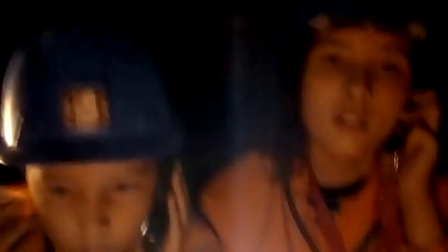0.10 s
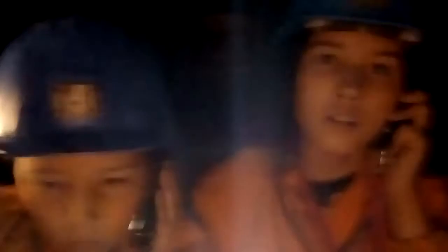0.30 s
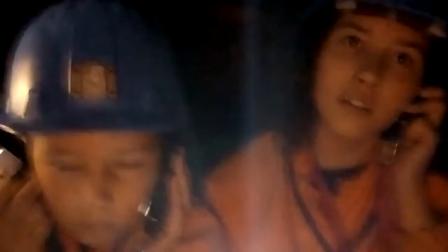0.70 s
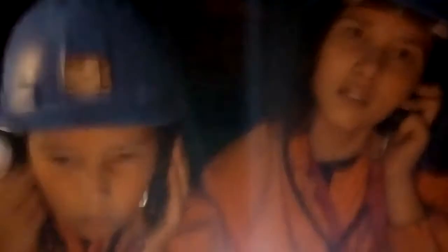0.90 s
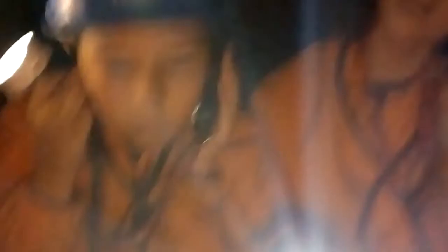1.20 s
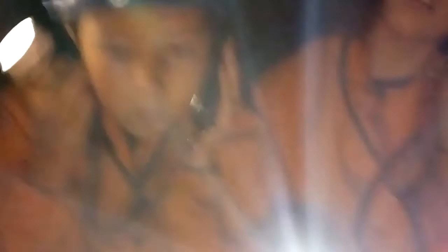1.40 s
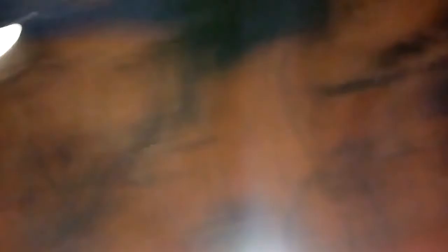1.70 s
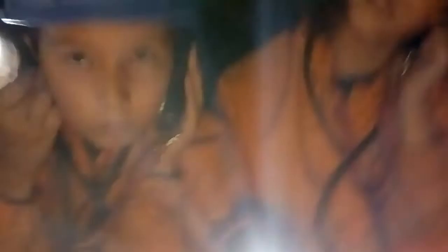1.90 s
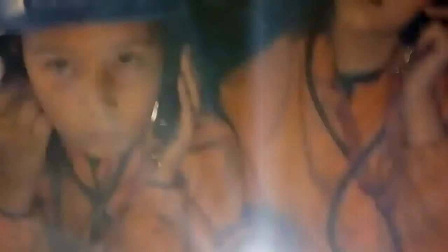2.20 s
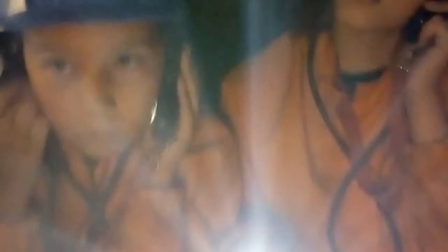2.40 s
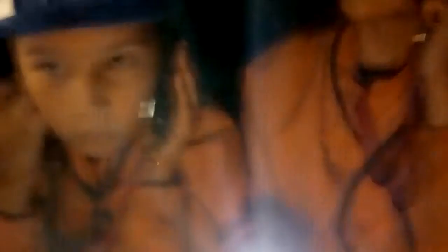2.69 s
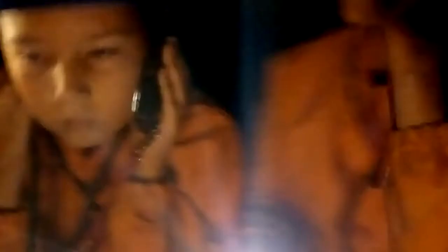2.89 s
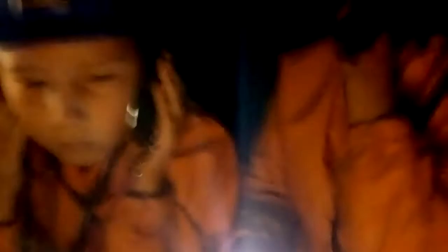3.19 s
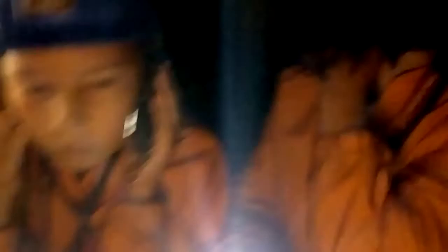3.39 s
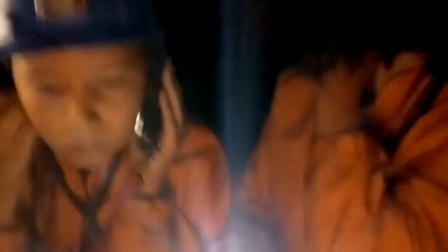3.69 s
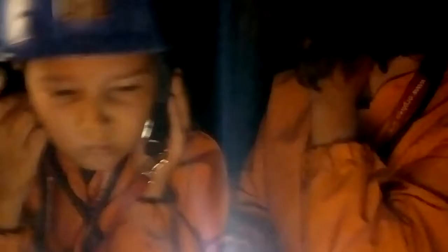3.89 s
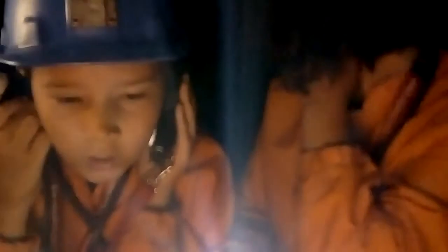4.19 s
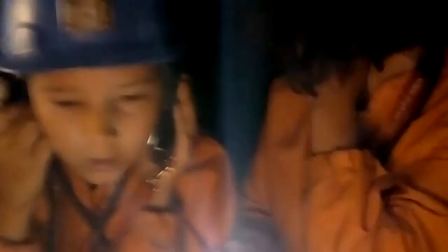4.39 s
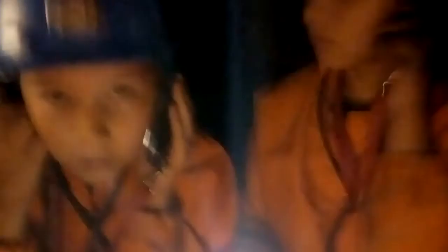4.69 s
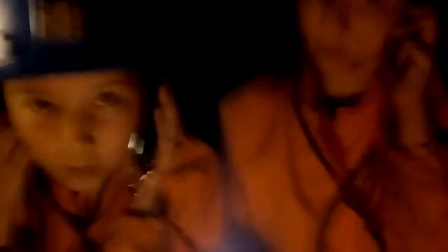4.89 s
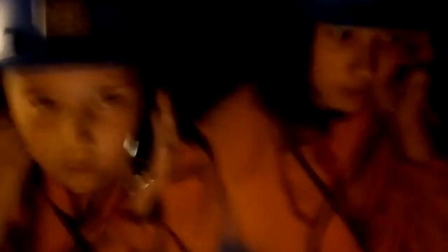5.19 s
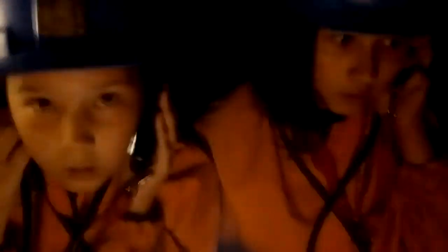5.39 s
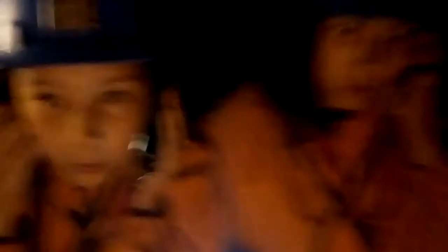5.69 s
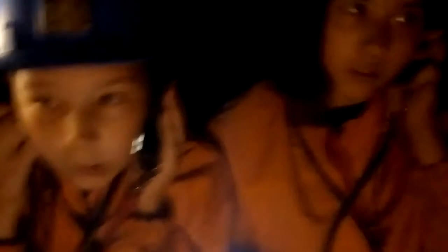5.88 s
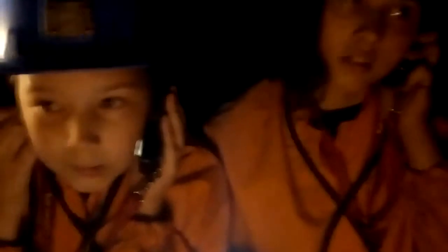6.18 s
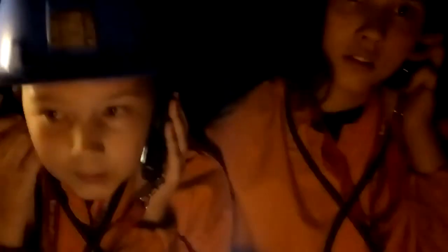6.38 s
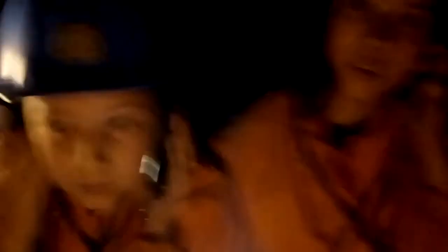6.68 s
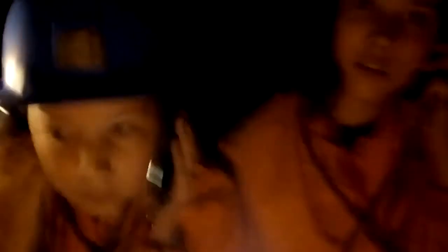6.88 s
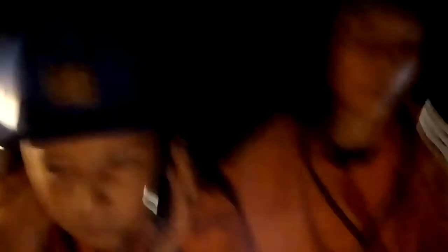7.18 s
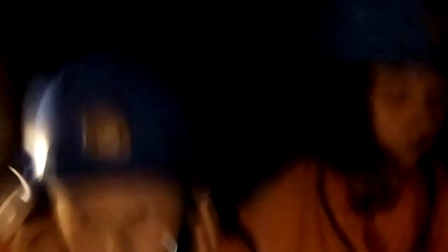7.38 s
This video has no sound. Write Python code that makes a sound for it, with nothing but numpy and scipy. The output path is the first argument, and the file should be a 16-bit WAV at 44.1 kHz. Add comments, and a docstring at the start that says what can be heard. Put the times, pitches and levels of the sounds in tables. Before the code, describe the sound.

A small mine train rumbles through a tunnel, heard inside its steel car, with booming jolts, rattling fittings, clanks, brief scrapes and late regular wheel knocking.

```python
"""A small mine train rolls through a tunnel, heard on two spaced microphones inside a steel passenger car.
Noise through resonant modes makes the cabin boom and the panels drone; gliding tones make jolts and groans.
Coloured noise with random impacts makes loose fittings chatter; short crashes with rings clank and click.
Late on, one wheel starts knocking at every turn, in damped modes and bursts of noise.
Steel scrapes on steel in two pairs of hissing noise strokes. The din overloads the recorder."""
import sys
import numpy as np
from scipy import signal
from scipy.fft import rfft, irfft
from scipy.io import wavfile

SR = 44100
rng = np.random.default_rng(int(sys.argv[2]) if len(sys.argv) > 2 else 0)


def output_pcm(signal):
    """Save a mono or channel-first signal as 16-bit PCM at the path in sys.argv[1].

    Samples are clipped to [-1, 1] before scaling.
    """
    pcm = np.clip(np.atleast_2d(signal).T, -1, 1) * 32767
    wavfile.write(sys.argv[1], SR, np.round(pcm).astype(np.int16))


N = 332514
TIME = np.arange(N) / SR
HZ = np.fft.rfftfreq(N, 1 / SR)

# hiss of sliding or shaken steel, relative spectrum: f/Hz, density/dB
HISS_SPECTRUM = [(700, -20), (1500, 2.5), (2600, 5.5), (3400, 6.5), (4300, 2), (5300, 3), (7000, 3),
                 (10200, 0.7), (11500, -2), (13500, -6.5), (15500, -13)]


def gain_of(db):
    """Amplitude gain of a level in dB."""
    return 10 ** (np.asarray(db) / 20)


def evened(x):
    """Scales to rms 1."""
    return x / np.sqrt(np.mean(x ** 2) + 1e-20)


def read_gain(points):
    """A dB spectrum, read over log frequency, as a gain at every bin."""
    f, db = np.transpose(points)
    return gain_of(np.interp(np.log(HZ + 1), np.log(f + 1), db))


def levels(rows):
    """One gain curve over time for each dB column."""
    s, *columns = np.transpose(rows)
    return [gain_of(np.interp(TIME, s, column)) for column in columns]


def resonances(modes, skirt):
    """Gain of a set of modes; a larger skirt power gives darker valleys."""
    power = 0
    for f, width, db in modes:
        detuning = 2 * (HZ - f) / width
        power = power + gain_of(db) ** 2 / (1 + detuning ** 2 / skirt) ** skirt
    return np.sqrt(power)


def smooth(x, seconds):
    """Gaussian average over time."""
    return irfft(rfft(x) * np.exp(-2 * (np.pi * HZ * seconds) ** 2), N)


def flutter(seconds, depth_db):
    """A random gain that changes on the given time scale."""
    return gain_of(depth_db * evened(smooth(rng.standard_normal(N), seconds)))


def noise():
    """Two unrelated white noises."""
    return rng.standard_normal((2, N))


def in_cabin(drive, colour):
    """Colours two unrelated drives; long waves reach both microphones alike, short ones do not."""
    # spread between the spaced microphones: f/Hz, side minus mid/dB
    mic_spread = [(90, -47), (140, -51), (210, -5), (260, -7.5), (350, -15.5), (520, -15.5), (620, -7),
                  (770, 0), (980, -2), (1170, 0), (1650, 3), (2200, 0), (15000, 0)]
    # balance between the microphones: f/Hz, left minus right/dB
    mic_balance = [(450, 0), (750, .8), (1300, 2.3), (2400, 2), (4400, 1.2), (8000, 2), (15000, .5)]
    mid, side = rfft(drive)
    width = read_gain(mic_spread)
    lean = read_gain(mic_balance) ** .5  # half the difference at either microphone
    left = (mid + width * side) * lean
    right = (mid - width * side) / lean
    pair = np.array([left, right]) / np.sqrt(1 + width ** 2)
    return irfft(pair * evened(colour), N)


def sustained(x, seconds):
    """Holds the power even over the given time, as under a steady drive."""
    return x / np.sqrt(abs(smooth((x ** 2).mean(0), seconds)) + 1e-9)


def impacts(per_s, spread_db, ring_s):
    """Power of many small random impacts, each dying quickly."""
    struck = rng.random(N) < per_s / SR
    size = gain_of(spread_db * np.minimum(rng.exponential(1, N), 3)) * struck
    power = signal.lfilter([1], [1, -np.exp(-1 / (ring_s * SR))], size ** 2)
    return power / power.mean()


def crowded_modes(width_hz, depth_db):
    """The ragged response of steel parts with too many modes to list."""
    ripple = smooth(rng.standard_normal(N), seconds=width_hz * N / SR ** 2)[:len(HZ)]
    return gain_of(depth_db * evened(ripple))


def patchy(x, seconds, width_hz, depth_db):
    """The load shifts between the steel parts: narrow bands swell and fade, each in its own time."""
    z = signal.stft(x, nperseg=2048, noverlap=1536)[2]
    frames = int(np.clip(seconds * SR / 512, 1, 60))
    bins = int(np.clip(width_hz * 2048 / SR, 1, 60))
    patch = np.outer(np.hanning(2 * bins + 1), np.hanning(2 * frames + 1))
    field = signal.fftconvolve(rng.standard_normal(z.shape[1:]), patch, "same")
    gain = evened(gain_of(depth_db * evened(field)))
    return signal.istft(z * gain, nperseg=2048, noverlap=1536)[1][:, :N]


def swell(start, hold_s, rise_s, fall_s):
    """Rises in a straight line, holds, and dies away exponentially."""
    t = TIME - start
    return np.clip(t / rise_s, 0, 1) * np.exp(-np.clip((t - hold_s) / fall_s, 0, 20))


def blows(rows, spectrum, rise_s, crack_db, tail_db, tail_s, ring_db, ring_s):
    """Each blow cracks, crashes densely and dies fast, echoes from the walls, and rings the struck part."""
    power, rings = np.zeros(N), np.zeros((2, N))
    for s, db, t60, hz in rows:
        start = max(round(s * SR), 0)
        t = TIME[:N - start][:SR // 2]
        onset = gain_of(db) * (1 - np.exp(-t / rise_s))
        crack = gain_of(crack_db) * np.exp(-t / 0.00097)
        crash = gain_of(-60 * t / t60)
        echo = gain_of(tail_db - 60 * t / tail_s)
        power[start:start + len(t)] += (onset * (crack + crash + echo)) ** 2
        # one main mode and inharmonic neighbours, each in its own phase at either microphone
        ratios = [1, *rng.uniform(0.68, 1.35, size=4)]
        for ratio, share in zip(ratios, [1.0, 0.22, 1.0, 0.39, 0.58]):
            mode = np.sin(2 * np.pi * (hz * ratio * t + rng.random((2, 1))))
            rings[:, start:start + len(t)] += share * onset * gain_of(ring_db - 60 * t / ring_s) * mode
    return in_cabin(noise() * np.sqrt(power), read_gain(spectrum)) + rings


def fitting_clicks():
    """Small fittings click: brief bright noise with a high thin ring."""
    # clicks, before the mix gain: t/s, level/dB, t60/s, ring f/Hz
    click_times = [(0.0844, -35, 0.077, 5700), (0.8294, -40, 0.07, 8340), (1.238, -36, .06, 7440),
                   (1.4117, -38, 0.06, 6800), (1.4282, -33, 0.045, 9200), (1.728, -36, 0.07, 5860),
                   (2.4453, -35, 0.06, 9000), (3.7584, -36.5, 0.049, 9100), (3.8736, -40, 0.098, 5240),
                   (3.9344, -38, 0.07, 5830), (4.585, -37, 0.05, 11000), (4.627, -33, 0.077, 6440),
                   (4.9102, -35, 0.07, 9000), (5.39, -37, 0.054, 8930), (5.655, -35, 0.056, 5270),
                   (5.69, -35, 0.07, 5140), (5.7688, -38, 0.066, 5330), (6.2138, -34.5, 0.063, 5700),
                   (6.77, -39, 0.06, 9050), (6.9152, -38, 0.055, 5230)]
    # relative spectrum: f/Hz, density/dB
    click_spectrum = [(700, -25), (2000, -1), (5000, 6), (9000, 7.5), (12000, 5.5), (15500, -7)]
    return blows(click_times, click_spectrum, rise_s=0.00033, crack_db=-6,
                 tail_db=-28, tail_s=0.18, ring_db=-11, ring_s=.1)


def steel_clanks():
    """Heavy steel clanks: a slower, darker crash with a lower ring."""
    # clanks, before the mix gain: t/s, level/dB, t60/s, ring f/Hz
    # three rows, at 6.27, 6.493 and 6.718 s, ring with the wheel knocks
    clank_times = [(0.0094, -23, 0.21, 1370), (.835, -22, .15, 1050), (0.709, -19, 0.15, 1445),
                   (1.625, -19, 0.17, 1050), (1.7494, -18.5, 0.34, 980), (1.8687, -15, 0.18, 1096),
                   (2.556, -17.5, 0.14, 1280), (2.822, -18, 0.23, 1040), (3.1634, -16.5, 0.16, 1400),
                   (3.7174, -18.5, 0.14, 1280), (4.3844, -18, 0.24, 1110), (4.495, -17, 0.17, 1280),
                   (4.645, -20, 0.13, 1160), (4.902, -18.5, .14, 1210), (5.117, -21.5, 0.27, 933),
                   (5.2929, -19, 0.25, 1310), (6.27, -23, .12, 1490), (6.493, -23, .14, 1660),
                   (6.718, -21, .14, 1560), (7.184, -22, 0.1, 1150)]
    # relative spectrum: f/Hz, density/dB
    clank_spectrum = [(150, -17), (500, 13), (800, 18), (1300, -2), (2000, 0.5), (3000, -13), (5000, -20),
                      (9000, -19), (15000, -40)]
    return blows(clank_times, clank_spectrum, rise_s=0.0012, crack_db=-3,
                 tail_db=-17, tail_s=.3, ring_db=-9, ring_s=0.15)


def bursts():
    """Strength of chatter and of hiss in the bursts of rattling."""
    # bursts, before the mix gain: start t/s, hold/s, chatter level/dB, hiss level/dB
    rattle_times = [(0.207, 0.076, -38, -47), (0.452, 0.13, -33.5, -50), (0.715, 0.037, -34, -59),
                    (0.809, 0.11, -34.5, -46), (1.176, 0.045, -33, -40.5), (1.394, .03, -35.5, -48),
                    (1.51, 0.035, -33.5, -41.5), (1.847, 0.077, -34, -50), (2.093, 0.051, -35, -52),
                    (2.33, 0.081, -35.5, -45), (3.15, 0.021, -35.5, -43), (3.572, 0.033, -32, -47),
                    (3.868, 0.17, -36.5, -48), (4.158, 0.077, -37, -53), (5.474, 0.14, -35, -50.5),
                    (6.592, 0.037, -32.5, -47), (7.41, 0.073, -37, -46)]
    power = np.zeros((2, N))
    for start, hold, *db in rattle_times:
        strength = swell(start, hold, rise_s=0.0092, fall_s=0.028)
        power += (gain_of(db)[:, None] * strength) ** 2
    return np.sqrt(power)


def shaking(rattles):
    """Strength of chatter and hiss: restless metal with the bursts of rattling on top."""
    # loose metal between rattles, before the mix gain: t/s, chatter level/dB, hiss level/dB
    unrest = [(0, -22.5, -38), (.18, -34.5, -44.5), (.3, -30, -39.5), (.56, -30.5, -45.5), (.7, -33, -45),
              (1.04, -36.5, -49), (1.1, -32, -46), (1.4, -37.5, -48.5), (1.85, -30, -41), (2, -34, -46),
              (2.15, -33, -43), (2.3, -38.5, -47), (2.6, -30.5, -43.5), (2.9, -31.5, -45.5),
              (3.1, -31.5, -45), (3.3, -32.5, -45.5), (3.48, -37, -46.5), (3.55, -39, -54),
              (3.66, -34, -45.5), (3.82, -41, -49.5), (4.1, -40, -48), (4.6, -34.5, -48), (4.7, -37, -55),
              (4.85, -35.5, -43.5), (5.2, -38, -48.5), (5.4, -36, -47.5), (5.9, -36.5, -47),
              (6.35, -35, -47), (6.75, -37, -52.5), (7.3, -38.5, -47), (7.54, -35, -47)]
    restless = np.array(levels(unrest)) * flutter(seconds=0.017, depth_db=1.0)
    return np.hypot(restless, rattles)


def scraping():
    """Strength of the strokes of steel scraping on steel."""
    # strokes, before the mix gain: start t/s, hold/s, fall/s, level/dB
    strokes = [(2.597, 0.075, 0.15, -34), (2.893, 0.1, 0.053, -34.5), (4.624, 0.08, 0.057, -33),
               (4.894, 0.12, 0.068, -34.5)]
    return sum(gain_of(db) * swell(start, hold, rise_s=0.044, fall_s=fall)
               for start, hold, fall, db in strokes)


def loose_metal(rattles):
    """Dense chatter of loose parts, and the gritty hiss of steel sliding on steel."""
    # relative spectra of chatter and of scraping: f/Hz, density/dB
    chatter_spectrum = [(300, -41), (600, -4), (900, 2), (1200, 2), (1450, -2), (1800, -6.5), (2150, -11),
                        (2600, -17), (3400, -19), (5000, -25), (10000, -49)]
    scrape_spectrum = [(700, -20), (1500, 9.5), (2600, 5.5), (3400, 8), (4500, 4.5), (7000, 4), (10200, 3),
                       (11500, -0.5), (13500, -3), (15500, -13)]
    # thin ringing of scraped steel: f/Hz, width/Hz, level/dB
    steel_modes = [(5730, 110, -1), (9000, 120, -6), (10200, 120, -7)]
    chatter_level, hiss_level = shaking(rattles)
    knocks = np.sqrt(0.35 + 0.55 * impacts(per_s=97, spread_db=2.0, ring_s=0.027))
    grit = np.sqrt(0.55 + 0.38 * impacts(per_s=330, spread_db=3.3, ring_s=0.003))

    chatter_colour = read_gain(chatter_spectrum) * crowded_modes(width_hz=14, depth_db=1.7)
    chatter = in_cabin(noise() * knocks, chatter_colour)
    chatter = evened(patchy(chatter, seconds=.045, width_hz=95, depth_db=2.0))

    steel = (1 + 0.35 * resonances(steel_modes, skirt=1.3)) * crowded_modes(width_hz=14, depth_db=0.7)
    hiss = evened(in_cabin(noise() * grit, read_gain(HISS_SPECTRUM) * steel))
    scrape = evened(in_cabin(noise() * grit, read_gain(scrape_spectrum) * steel))
    scrape = scrape * flutter(seconds=0.004, depth_db=0.8)
    sliding = gain_of(3.0) * hiss_level * hiss + gain_of(3.0) * scraping() * scrape
    sliding = patchy(sliding, seconds=.04, width_hz=90, depth_db=2.5)
    return gain_of(3.5) * chatter_level * chatter + sliding


def clunks(rows):
    """A heavy panel is struck: damped modes slightly out of step at the two microphones."""
    rise_s, t60_s = 0.008, 0.16
    out = np.zeros((2, N))
    for s, hz, db in rows:
        start = round(s * SR)
        t = TIME[:N - start][:SR // 2]
        ring = (1 - np.exp(-t / rise_s)) * gain_of(db - 60 * t / t60_s)
        # the main mode, then weaker neighbours
        modes = [(1, 2), (rng.uniform(.72, .85), 1.1), (rng.uniform(1.12, 1.2), 1.1),
                 (rng.uniform(1.5, 1.9), .6)]
        for ratio, share in modes:
            phase = rng.random() + 0.072 * rng.standard_normal((2, 1))  # in turns
            out[:, start:start + len(t)] += share * ring * np.sin(2 * np.pi * (hz * ratio * t + phase))
    return out


def panel_bumps():
    """Wall panels bump in their frames and ring as struck plates."""
    # bumps, before the mix gain: t/s, ring f/Hz, level/dB
    bump_times = [(.195, 381, -21), (.348, 395, -15), (1.147, 454, -14.5), (1.685, 357, -19),
                  (1.893, 401, -24), (2.074, 405, -16.5), (2.488, 379, -12.5), (2.72, 380, -16),
                  (3.57, 355, -18), (3.715, 324, -13.5), (4.418, 334, -15), (5.116, 414, -16),
                  (5.353, 415, -11.5), (5.941, 465, -17), (6.612, 349, -17)]
    return clunks(bump_times)


def wheel_knocks():
    """A flat spot lands once a turn: panels clunk, the running gear crashes, and fittings sizzle on."""
    # one row a turn: clunk f/Hz, clunk level/dB, crash level/dB, sizzle level/dB
    turns = [(461, -14, -24, -35.5), (424, -23, -33, -37), (416, -13.5, -24, -34), (449, -15.5, -21, -35),
             (466, -19, -22, -35), (491, -18, -23.5, -43), (432, -15.5, -29, -39), (468, -18.5, -29, -42),
             (471, -18, -26.5, -40.5)]
    # relative spectrum of the crash: f/Hz, density/dB
    crash_spectrum = [(250, -12), (600, -7), (900, 8), (1300, 4.5), (1900, -0.5), (2600, -11.5),
                      (3600, -12), (5500, -20), (12000, -34)]
    first_s, turn_s = 5.6015, .2223
    crash_t60_s, sizzle_t60_s = 0.15, 0.3
    landings = first_s + turn_s * np.arange(len(turns))
    since = np.maximum(TIME - landings[:, None], 0)
    clunk_hz, clunk_db, crash_db, sizzle_db = np.transpose(turns)
    onset = 1 - np.exp(-since / 0.0013)
    crash_level = (onset * gain_of(crash_db[:, None] - 60 * since / crash_t60_s)).sum(0)
    sizzle_fall = gain_of(sizzle_db[:, None] - 60 * since / sizzle_t60_s)
    sharp_start = 1 + .7 * np.exp(-since / .004)
    sizzle_level = (onset * sizzle_fall * sharp_start).sum(0)
    bounces = np.sqrt(0.63 + 0.47 * impacts(per_s=360, spread_db=-0.5, ring_s=.003))
    crash = crash_level * bounces * in_cabin(noise(), read_gain(crash_spectrum))
    sizzle = sizzle_level * in_cabin(noise(), read_gain(HISS_SPECTRUM))
    return clunks(zip(landings, clunk_hz, clunk_db)) + crash + sizzle


def groans():
    """A wheel grips and slips on the rail, swelling briefly on one unsteady pitch."""
    # groans, before the mix gain: middle t/s, length/s, f/Hz, upward glide/(octaves/s), level/dB
    groan_times = [(0.079, 0.21, 323, -0.25, -12), (0.05, 0.19, 710, 0.26, -22.5),
                   (0.335, 0.18, 319, -0.27, -16.5), (0.487, 0.12, 354, 0.24, -14.5),
                   (.7, 0.12, 472, 0.065, -19), (0.744, 0.21, 550, 0.02, -18.5),
                   (1.411, 0.16, 349, 0.28, -16), (1.56, .2, 506, 0.18, -16.5),
                   (2.355, .18, 248, 0.4, -17.5), (2.408, .14, 299.6, .2, -19.5),
                   (2.531, .18, 310, 0.049, -16), (2.557, 0.19, 356, 0.52, -17),
                   (2.895, 0.085, 483, 0.05, -18), (2.971, 0.147, 621, 0.4, -22.5),
                   (3.34, .11, 506, 0.085, -19), (3.565, 0.32, 715, 0.02, -24.5),
                   (3.74, 0.15, 473, -0.018, -16.5), (5.146, 0.16, 482, 0.29, -18),
                   (6.755, 0.12, 500, 0.34, -16)]
    out = np.zeros(N)
    waver = flutter(seconds=0.0041, depth_db=0.05)  # multiplies the pitch
    for s, length, hz, glide, db in groan_times:
        on = abs(TIME - s) < length / 2
        t = TIME[on] - s
        turns = np.cumsum(hz * 2 ** (glide * t) * waver[on]) / SR
        arch = np.cos(np.pi * t / length)
        out[on] += gain_of(db) * np.sqrt(2) * arch * np.sin(2 * np.pi * turns)
    return out


def jolts():
    """Track jolts swing the car body or cabin air for a few cycles, their unsteady pitch sagging."""
    # jolts, before the mix gain: peak t/s, f/Hz, level/dB
    jolt_times = [(.139, 156.3, -7.5), (.237, 130, -5.5), (.252, 81.8, -9), (.381, 148.4, -5.5),
                  (.502, 90.8, -13), (0.526, 128.1, -7.5), (.603, 138.6, -5.5), (.674, 95.8, -14),
                  (.69, 164.8, -15), (0.804, 148.2, -8), (.885, 162.9, -7), (.971, 143.3, -8.5),
                  (1.169, 130.7, -8), (1.268, 136, -6.5), (1.567, 98.3, -12), (1.638, 154.3, -8),
                  (1.753, 148, -11), (2.053, 158.2, -9), (2.444, 141.9, -14), (2.607, 135.4, -10.5),
                  (2.708, 89, -14), (2.821, 140, -8), (2.892, 160, -12.5), (2.982, 90, -10),
                  (3.083, 138.8, -10), (3.31, 141.9, -9), (3.452, 92, -12), (3.496, 137.6, -10.5),
                  (3.838, 89.5, -14), (4.015, 132.9, -10), (4.45, 142.6, -8.5), (4.519, 139, -8.5),
                  (4.687, 82, -10), (4.729, 135.2, -11), (4.919, 152.5, -7.5), (4.988, 83.2, -13),
                  (5.225, 87.6, -16), (5.586, 142.9, -11.5), (5.805, 90.8, -13), (6.019, 87.8, -10),
                  (6.319, 91, -14), (6.507, 148.7, -7), (6.695, 88, -7.5), (7.003, 80, -17),
                  (7.137, 88.4, -9), (7.455, 73.8, -9.5)]
    spread_s, sag = 0.024, 1.24  # Gaussian deviation in s; fall of the pitch in octaves/s
    out = np.zeros(N)
    waver = flutter(seconds=0.0064, depth_db=0.6)  # multiplies the pitch
    for (s, hz, db), phase in zip(jolt_times, rng.random(len(jolt_times))):
        near = abs(TIME - s) < 4 * spread_s
        t = TIME[near] - s
        turns = phase + np.cumsum(hz * 2 ** (-sag * t) * waver[near]) / SR
        bell = np.exp(-.5 * (t / spread_s) ** 2)
        out[near] += gain_of(db) * np.sqrt(2) * bell * np.sin(2 * np.pi * turns)
    return out


def rolling(rattle_level):
    """Rough rail shakes the car body, the cabin air, the floor, the wall panels and the plates."""
    # modes, each table: f/Hz, width/Hz, level/dB
    body_modes = [(71, 4.4, 1.5), (80.9, 9.7, 0.5), (99.7, 18.4, -0.5), (113, 23, -5.5)]  # the car body on its springs
    air_modes = [(132.2, 25, -1), (148, 27, -3), (164, 12, -3), (172.5, 2.9, 1.5)]  # the air in the cabin
    panel_modes = [(299.8, 9.5, 0.5), (321.3, 17, -1.5), (346.5, 4.7, 3.5), (367, 16, -5.5), (417, 40, -5),
                   (462.6, 8.6, -0.5), (494, 36.5, -4.5)]  # the large wall panels
    plate_modes = [(570, 23, -4.5), (590, 32, -5), (614, 18, -4), (644, 11.4, -2.5), (675, 18, -0.5),
                   (710, 14.3, -0.5), (746, 25, -2.5), (788, 42, -10), (825, 15.5, -5.5), (904, 26, -14),
                   (934, 18, -9), (1010, 18, -11.5)]  # smaller, stiffer plates
    floor_modes = [(255.5, 33, 0)]  # the floor plate
    # slow rolling levels, before the mix gains: t/s, body thud/dB, cabin boom/dB, panel drone/dB
    rumble = [(0, -17, -15, -16), (.3, -18, -15, -16.5), (.6, -19, -13.5, -19), (.85, -19.5, -13.5, -20),
              (1.05, -20, -19, -18), (1.5, -19, -16, -17), (2.22, -19.5, -14.5, -18),
              (2.55, -17, -12.5, -15.5), (2.85, -21, -16.5, -17), (3.25, -22.5, -17, -15.5),
              (3.85, -15.5, -16, -20), (4.45, -19.5, -16.5, -17), (4.9, -19, -15.5, -19),
              (5.25, -15.5, -14.5, -18.5), (5.75, -16.5, -17, -19.5), (6.15, -19.5, -16, -18),
              (6.6, -17, -17.5, -19), (7.28, -18.5, -16, -22), (7.54, -15, -12.5, -15.5)]
    # slow levels of the plates and of the floor, before the mix gains: t/s, level/dB
    plate_ring = [(0, -22), (.19, -30), (.35, -22), (.52, -28), (.75, -23), (1, -30.5), (1.16, -23),
                  (1.34, -28), (1.55, -25.5), (1.7, -32.5), (1.9, -25.5), (2.32, -28), (2.5, -24), (3, -25),
                  (3.26, -21), (3.46, -26.5), (3.62, -23.5), (3.8, -27.5), (4, -25.5), (4.16, -27),
                  (4.4, -23), (4.76, -30), (5, -26), (5.55, -25), (5.85, -26.5), (6.2, -24.5), (6.62, -25),
                  (7.54, -26.5)]
    floor_drone = [(0, -23.5), (2.5, -28), (2.8, -31), (5.15, -30.5), (7.54, -23.5)]

    thud_level, boom_level, drone_level = levels(rumble)
    thud_level = thud_level * flutter(seconds=0.029, depth_db=1.35)
    boom_level = boom_level * flutter(seconds=0.078, depth_db=1.5)
    # rattling drives the wall panels too
    drone_level = np.hypot(drone_level, gain_of(15) * rattle_level)

    low_cut = 1 / np.sqrt(1 + (54 / (HZ + 1)) ** 8)
    thud = sustained(in_cabin(noise(), resonances(body_modes, skirt=1.38) * low_cut), seconds=0.019)
    boom = sustained(in_cabin(noise(), resonances(air_modes, skirt=1.43) * low_cut), seconds=0.035)
    drone = sustained(in_cabin(noise(), resonances(panel_modes, skirt=1.36) * low_cut), seconds=0.057)
    plates = sustained(in_cabin(noise(), resonances(plate_modes, skirt=1.37) * low_cut), seconds=0.098)
    floor = sustained(in_cabin(noise(), resonances(floor_modes, skirt=0.95)), seconds=0.063)

    judder = np.sqrt(0.62 + 0.57 * impacts(per_s=110, spread_db=2.0, ring_s=0.016))
    walls = gain_of(-0.23) * drone_level * drone + gain_of(1.0) * levels(plate_ring)[0] * plates
    walls = patchy(walls, seconds=.09, width_hz=45, depth_db=2.4)
    deep = gain_of(2.16) * thud_level * thud + gain_of(1.0) * boom_level * boom
    return deep + (walls + levels(floor_drone)[0] * floor) * judder


def scene():
    """The rolling car with its jolts and bumps, the groaning wheels and all the loose steel."""
    clicks_and_clanks = gain_of(1.5) * fitting_clicks() + gain_of(-2.5) * steel_clanks()
    rattles = bursts()
    car = rolling(rattles[0]) + gain_of(-0.5) * jolts() + gain_of(1.0) * panel_bumps()
    wheels = gain_of(-1.5) * groans() + wheel_knocks()
    return car + wheels + loose_metal(rattles) + clicks_and_clanks


def record(dry):
    """The loudest swings round off against the recorder's ceiling; then the band limit."""
    knee, edge_hz = 12, 15400
    rounded = dry / (1 + abs(dry) ** knee) ** (1 / knee)
    low_pass = signal.firwin(511, edge_hz, window=("kaiser", 9), fs=SR)
    return signal.oaconvolve(rounded, low_pass[None], "same")


dry = scene()
out = record(dry)
output_pcm(out)
```